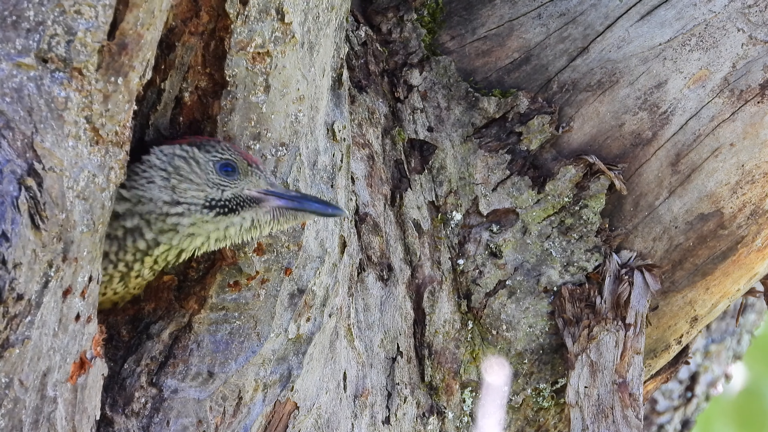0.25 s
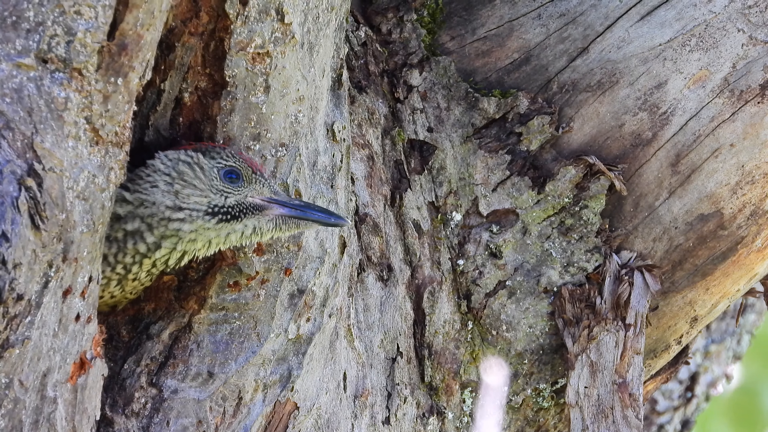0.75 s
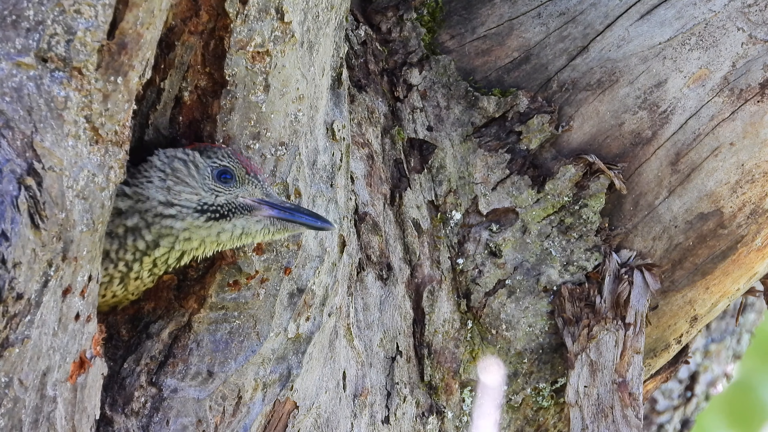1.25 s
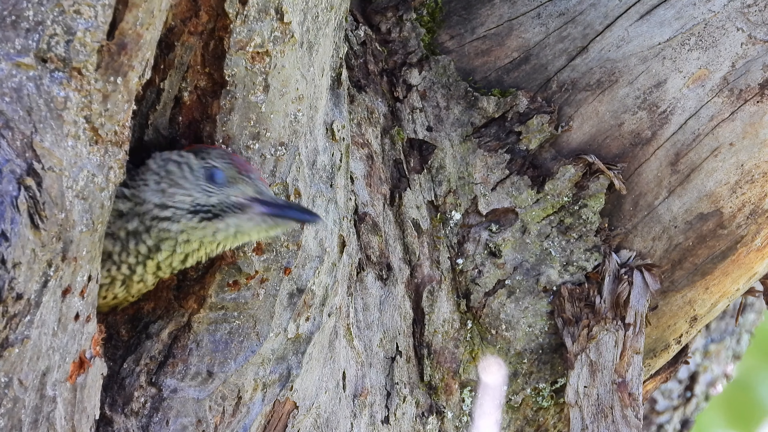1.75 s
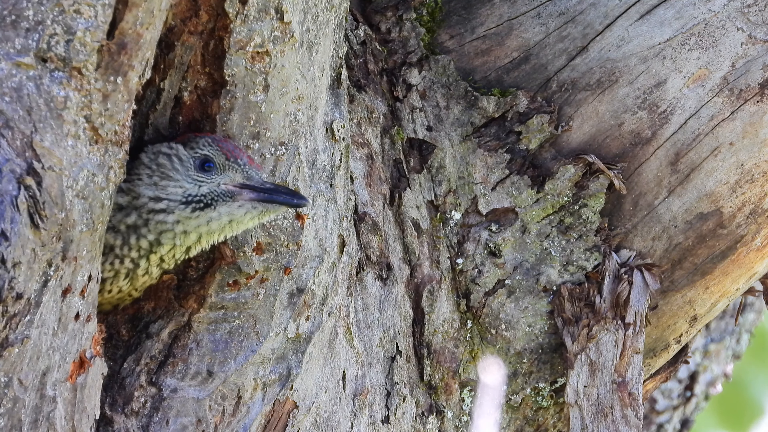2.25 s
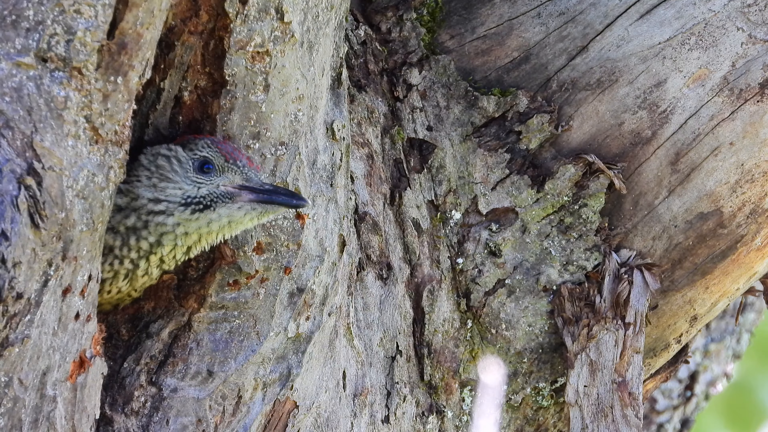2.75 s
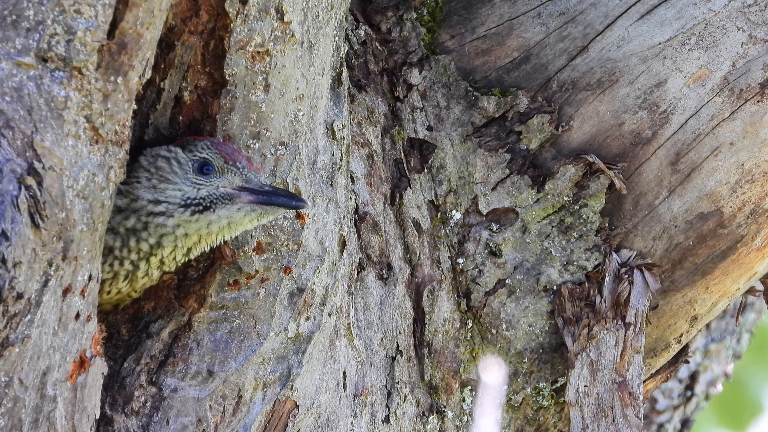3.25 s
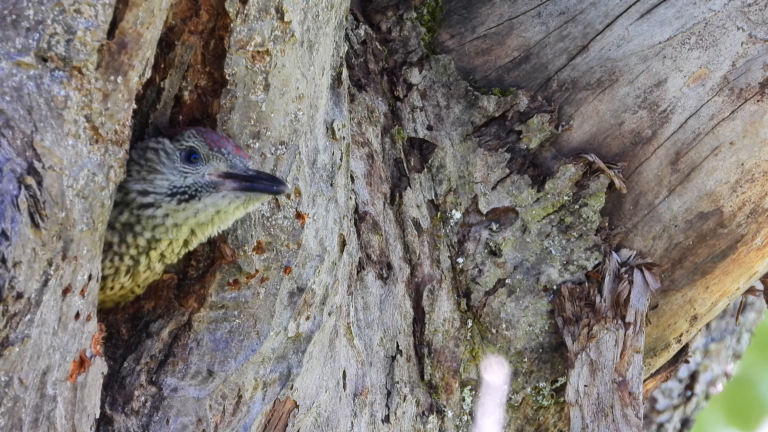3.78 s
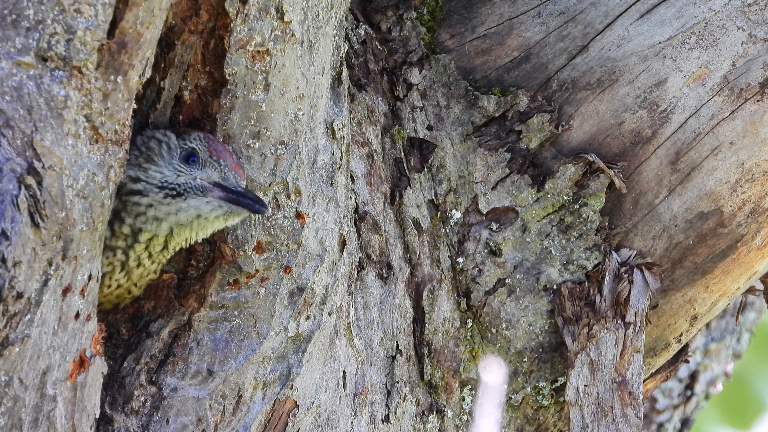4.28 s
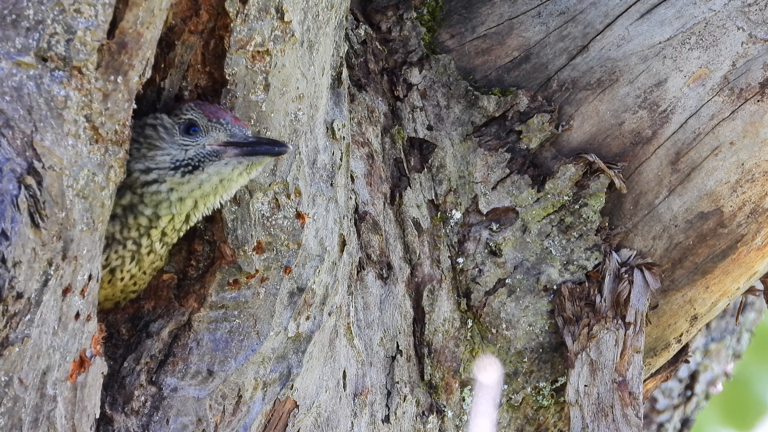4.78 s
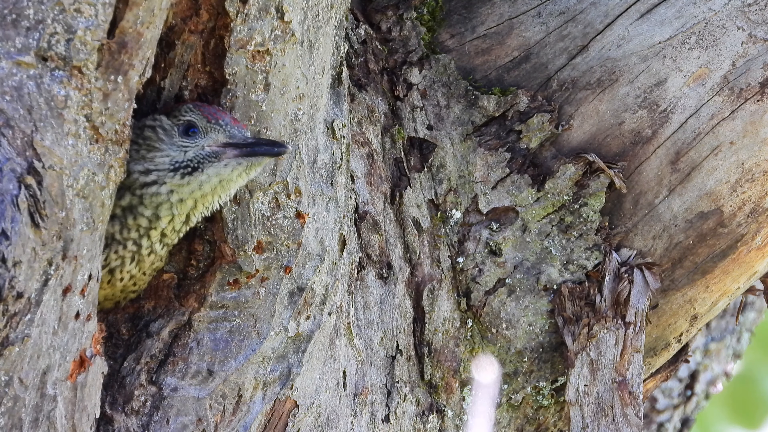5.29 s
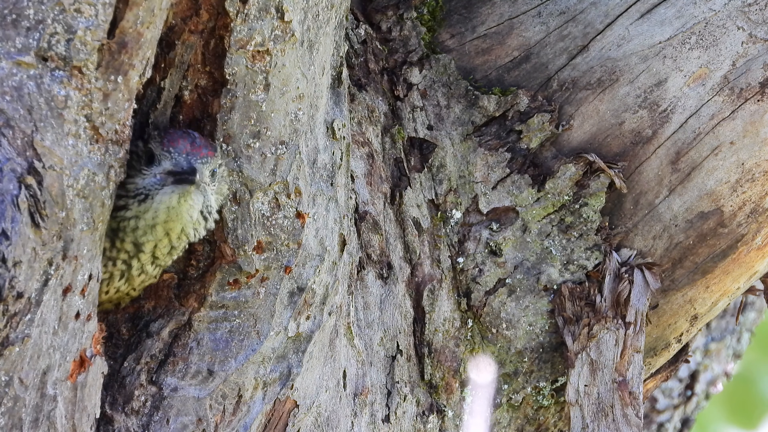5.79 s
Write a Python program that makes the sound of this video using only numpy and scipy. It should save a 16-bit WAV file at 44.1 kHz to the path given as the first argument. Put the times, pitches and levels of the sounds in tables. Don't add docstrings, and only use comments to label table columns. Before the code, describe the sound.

Quiet outdoor woodland with one nesting woodpecker calling: a sharp yelp early, another near two seconds, then two closer together around four. All are very brief, falling and rough at the end, with slight hollow ringing and a short tree echo. Light claw scrapes come early; tiny distant bird notes dot the gaps. Low traffic and uneven engine throb sit underneath, only on the right; gentle preamplifier hiss fills both sides.

```python
import sys
import numpy as np
from scipy import signal
from scipy.fft import rfft, irfft, next_fast_len
from scipy.io import wavfile
from scipy.ndimage import uniform_filter1d, map_coordinates

SR = 44100
rng = np.random.default_rng(int(sys.argv[2]) if len(sys.argv) > 2 else 0)


def generate_wav(signal):
    frames = np.transpose(np.atleast_2d(signal))
    scaled = np.clip(frames, -1, 1) * 32767
    pcm = np.round(scaled).astype(np.int16)
    wavfile.write(sys.argv[1], SR, pcm)


def elevation(decibels):
    levels = np.asarray(decibels, float)
    return 10 ** (levels / 20)


N = 265923


def unit(x):
    return x / np.sqrt(np.mean(x ** 2) + 1e-20)


def along(points, hz):
    f, v = np.transpose(points)
    return np.interp(np.log(hz + 1), np.log(f + 1), v)


def curves(rows, t):
    s, *cols = np.transpose(rows)
    return [np.interp(t, s, c) for c in cols]


def wobble(rate, size=N):
    knots = rng.standard_normal(int(size * rate / SR) + 4)
    return map_coordinates(knots, [np.arange(size) * rate / SR])


def coloured(x, spectrum):
    m = next_fast_len(len(x) + 8192)
    gain = elevation(along(spectrum, np.fft.rfftfreq(m, 1 / SR)))
    return irfft(rfft(x, m) * gain, m)[:len(x)]


def add(track, s, x):
    part = track[round(s * SR):][:len(x)]
    part += x[:len(part)]


# frequency in Hz, level in dB.
LEFT_HISS = [(30, -35), (100, -8), (250, -2.5), (1000, -1.5), (4000, -0.5), (16000, -0.5)]
RIGHT_HISS = [(30, -11), (250, -8.5), (3000, -0.5), (7000, -1), (10000, -2.5), (16000, -0.5)]
# frequency in Hz, level in dB.
ELECTRONIC_WHINE = [(9860, -84), (9890, -83)]


def preamplifiers(t):
    left = elevation(-57.5) * unit(coloured(rng.standard_normal(N), LEFT_HISS))
    right = elevation(-57.0) * unit(coloured(rng.standard_normal(N), RIGHT_HISS))
    whine = sum(elevation(db) * np.sin(2 * np.pi * hz * t) for hz, db in ELECTRONIC_WHINE)
    return np.array([left, right]) + whine


# time in seconds, level in dB.
ROAD_LEVEL = [(0.0, -65.5), (0.13, -62.5), (0.25, -63), (0.7, -64.5), (1.81, -64), (2.27, -63),
              (2.5, -64.5), (3.02, -64), (3.66, -64.5), (4.59, -61), (5.81, -64.5), (6.03, -63.5)]
# frequency in Hz, level in dB.
ROAD_SPECTRUM = [(40, -19), (90, -4.5), (200, -5), (420, -5), (800, 0.5), (1500, -2), (2200, -7),
                 (3000, -15.5), (5000, -25), (9000, -26)]


def traffic(t, patchy_db=2.0):
    z = signal.stft(rng.standard_normal(N + 512), nperseg=512)[2]
    patches = uniform_filter1d(rng.standard_normal(z.shape), size=5, axis=0)
    patches = uniform_filter1d(patches, size=12, axis=1)
    noise = signal.istft(z * elevation(patchy_db * unit(patches)), nperseg=512)[1][:N]
    return elevation(curves(ROAD_LEVEL, t)[0] + 6.5) * unit(coloured(noise, ROAD_SPECTRUM))


# time in seconds, firings gained on the steady rate, level in dB.
ENGINE_RUN = [(0, -.25, -67), (1.9, -.2, -67), (2.4, -.08, -67), (3, .08, -68), (4.1, -.04, -69),
              (4.9, -.32, -69), (6.03, .1, -69)]
# frequency in Hz, gain in dB.
EXHAUST_PIPE = [(50, -19), (85, -32), (100, 0.5), (130, -2.5), (200, 1), (260, -8.5), (290, -36), (400, -7),
                (450, -29)]


def engine(t, firing_hz=20.05):
    gained, db = curves(ENGINE_RUN, t)
    firings = np.floor(firing_hz * t + gained + .015 * wobble(9))
    pulses = (np.diff(firings, prepend=0) > 0) * elevation(1.8 * rng.standard_normal(N))
    return elevation(db + 4) * unit(coloured(pulses, EXHAUST_PIPE))


# frequency in Hz, width in Hz, level in dB.
MOTOR_TONES = [(173.7, 10, -67), (348, 5.6, -82.5), (87, 3.07, -80), (224, 7, -80), (264, 3.82, -76),
               (402, 2.36, -84.5)]


def motor(t):
    out = np.zeros(N)
    for hz, width, db in MOTOR_TONES:
        strength = 1 + 0.82 * wobble(width)
        tone = np.sin(2 * np.pi * hz * t + 0.92 * wobble(width))
        out += elevation(db) * unit(strength * tone)
    return out


# start in seconds, first pitch in Hz, glide in Hz, length in seconds, level in dB.
CLEAR_WHISTLES = [(.095, 504, 122, 0.07, -61), (0.303, 498, 208, 0.088, -58.5),
                  (2.325, 2350, -50, .03, -64), (2.813, 3590, 10, 0.028, -65),
                  (5.738, 2270, -80, 0.042, -57.5)]
HOARSE_CHIRPS = [(1.10, 3610, -210, 0.028, -59), (2.385, 3550, -40, 0.027, -60),
                 (2.48, 1420, -105, 0.027, -53), (2.58, 3500, -80, 0.053, -67),
                 (3.366, 3520, -120, 0.034, -57), (3.41, 3600, 0, 0.046, -57.5), (5.597, 3450, 0, .05, -69),
                 (5.86, 3500, -50, .05, -71)]


def small_birds():
    out = np.zeros(N)
    for rows, hoarse in [(CLEAR_WHISTLES, 0.27), (HOARSE_CHIRPS, 0.82)]:
        for s, hz, glide_hz, length, db in rows:
            u = np.arange(SR // 10) / SR / length
            tone = np.sin(2 * np.pi * np.cumsum(hz + glide_hz * u) / SR)
            smear = 1 - hoarse + hoarse * wobble(315, size=len(u))
            add(out, s, 2 * elevation(db) * tone * smear * np.sin(np.pi * np.minimum(u, 1)))
    return out


# start in seconds, length in seconds, level in dB, centre in Hz.
CLAW_SCRAPES = [
    (0.046, 0.052, -51, 1690),
    (0.749, 0.027, -53.5, 2000),
    (0.888, 0.017, -55, 3000),
    (1.097, 0.013, -56, 2500),
]


def claws():
    out = np.zeros(N)
    for s, length, db, hz in CLAW_SCRAPES:
        u = np.arange(SR // 10) / SR / length
        band = [(hz / 4, -20), (hz, 0), (hz * 2.6, -22)]
        grit = unit(coloured(rng.standard_normal(len(u)), band))
        add(out, s, elevation(db) * grit * np.sin(np.pi * np.minimum(u, 1)))
    return out


# frequency in Hz, 60 dB decay time in seconds.
TREE_DECAY = [(500, 0.087), (2000, 0.15), (8000, 0.0071)]


def surroundings(x, wet_db=-20):
    hz, t, z = signal.stft(rng.standard_normal(SR // 4), SR, nperseg=256)
    decay = elevation(-60 * t / along(TREE_DECAY, hz)[:, None])
    tail = signal.istft(z * decay, SR, nperseg=256)[1]
    late = signal.fftconvolve(np.pad(x, (500, 0)), tail / np.linalg.norm(tail))
    return x + elevation(wet_db) * late[:N]


# frequency in Hz, width in Hz, signed gain beside the direct sound.
HOLLOW_MODES = [(1160, 90, 1.3), (1826, 26, .76), (1948, 15, -.54), (2005, 79, 1.29), (2169, 250, -1.51),
                (2201, 62, 1.8), (2279, 26, 1.08)]


def hollow(x):
    m = next_fast_len(N + SR)
    f = np.fft.rfftfreq(m, 1 / SR)
    modes = np.zeros(len(f), complex)
    for hz, width, gain in HOLLOW_MODES:
        damping = 1j * f * width
        modes += gain * damping / (hz * hz - f * f + damping)
    return irfft(rfft(x, m) * (1 + modes), m)[:N]


JUMP_S, SWELL_S = .007, .012
LINGER_SHARE = 0.67


def phrase(s, db, hold_hz, hold_s, murmur_hz, jump_db, slide_s, croak_s, croak_db):
    slid = s + slide_s
    end = slid + hold_s
    slid_db = db - 1.5 - 39 * max(1.72 - hold_hz / 1000, 0)
    fade_db = -6
    sagged_hz = hold_hz - 1020 * hold_s
    return [(s - 0.032, murmur_hz, -61),
            (s - JUMP_S, murmur_hz, -40),
            (s, 2376, db + jump_db),
            (s + SWELL_S, 2230, db),
            (slid, hold_hz, slid_db),
            (slid + hold_s / 4, hold_hz, slid_db + 0.72 * fade_db),
            (end, sagged_hz, slid_db + fade_db),
            (end + 0.1386 * croak_s, 1243, -37),
            (end + .47 * croak_s, 840.5, croak_db),
            (end + LINGER_SHARE * croak_s, 840.5, croak_db - 9.5),
            (end + croak_s, 696, -62)]


# frequency in Hz, gain in dB.
THROAT_GAIN = [(300, -36), (700, -4), (1000, -6), (2200, -1), (2850, 5), (3400, -1), (4700, 2.5),
               (5400, -4), (6500, 2), (7700, -3), (8500, -12), (9500, -10.5), (12000, -14.5), (16000, -23)]


def breath(t, s, end, croak_s):
    rows = [(t[0], -61.5), (s - JUMP_S, -40), (s + SWELL_S, -41), (end - .008, -49),
            (end + 0.0022, -43), (end + LINGER_SHARE * croak_s, -50.5), (end + croak_s + 0.0081, -61.5)]
    breath_db, = curves(rows, t)
    rush = coloured(rng.standard_normal(len(t)), THROAT_GAIN)
    return elevation(breath_db) * unit(rush * elevation(wobble(505, size=len(t))))


# pitch in Hz, level in dB.
SECOND_PARTIAL = [(820, 4.5), (1200, -5), (1650, -15.5), (2220, -9.5), (2390, -3.5)]
UPPER_PARTIALS = [(820, -32), (1200, -38), (1620, -12.5), (1900, -9.5), (2220, -16), (2390, -15)]


def voice(t, hz, db, octave_db, slid, hold_s, tilt_db=-3):
    size, end = len(t), slid + hold_s
    slope = np.gradient(hz) * SR
    jump = np.clip(slope / 8e4, 0, 1)
    hoarse = np.clip(np.maximum((1550 - hz) / 200, jump), .03, 1)
    moving = np.clip(np.abs(slope) / 1.5e4, .2, 1)
    second_db = along(SECOND_PARTIAL, hz) + octave_db * (1 - hoarse)
    upper_db = along(UPPER_PARTIALS, hz) - 90 * np.clip(t - slid, 0, hold_s)
    waver = .13 * hoarse * wobble(1300, size=size)
    turn = 2 * np.pi * np.cumsum(hz * (1 + waver)) / SR
    out = np.sin(turn)
    for k in range(2, 13):
        level = second_db if k < 3 else upper_db + tilt_db * (k - 3)
        broken_db = np.minimum(4.5 * wobble(300, size=size), 3)
        tremor = k * 0.16 * moving * wobble(596, size=size)
        out += elevation(level + along(THROAT_GAIN, k * hz) + broken_db) * np.sin(k * turn + k * k + tremor)
    flutter_db = np.minimum((.4 + 5 * hoarse) * wobble(400, size=size), 3) - 3 * jump
    catch_s = 0.0037
    catch_db = -0.5 * np.exp(-((t - end - catch_s) / catch_s) ** 2)
    return out * elevation(db + flutter_db + catch_db)


# top of the jump in seconds, peak in dB, pitch held after the slide in Hz,
# hold in seconds, octave partial in dB.
CALLS = [
    (0.3652, -23.5, 1612, 0.02, -13),
    (2.0864, -27, 1680, .012, -1),
    (3.892, -27.5, 1675, .010, -0.5),
    (4.563, -23, 1741, 0.051, -3.5),
]
# murmur in Hz, jump in dB under the peak, slide in seconds,
# croak in seconds, croak in dB.
CALL_EDGES = [
    (1056, -7, .038, .034, -39.5),
    (1424, -2, .044, .044, -42),
    (1097, -4.5, .038, 0.031, -44),
    (1810, -2, .039, 0.053, -39),
]


def woodpecker():
    out = np.zeros(N)
    for (s, peak_db, hold_hz, hold_s, octave_db), edges in zip(CALLS, CALL_EDGES):
        slide_s, croak_s = edges[2:4]
        t = s - .036 + np.arange(SR // 5) / SR
        slid = s + slide_s
        end = slid + hold_s
        course = np.array(curves(phrase(s, peak_db, hold_hz, hold_s, *edges), t))
        hz, db = uniform_filter1d(course, size=120, axis=1, mode="nearest")
        call = voice(t, hz, db, octave_db, slid, hold_s) + breath(t, s, end, croak_s)
        fade = np.clip(np.minimum(t - t[0], end + croak_s + .012 - t) / .008, 0, 1)
        add(out, t[0], call * fade)
    return out


def scene():
    t = np.arange(N) / SR
    nearby = surroundings(hollow(woodpecker()) + small_birds() + claws())
    heard = nearby + engine(t) + motor(t) + traffic(t)
    return np.array([np.zeros(N), heard])


def roll_off(x):
    return signal.sosfilt(signal.butter(12, 16120, fs=SR, output="sos"), x)


# frequency in Hz, gain in dB.
PASS_BAND = [(20, -11), (60, 0), (15700, 0), (15800, -60)]


def record(dry):
    noisy = dry + preamplifiers(np.arange(N) / SR)
    kept = np.array([coloured(channel, PASS_BAND) for channel in noisy])
    return roll_off(kept)


dry = scene()
out = record(dry)
generate_wav(out)
```